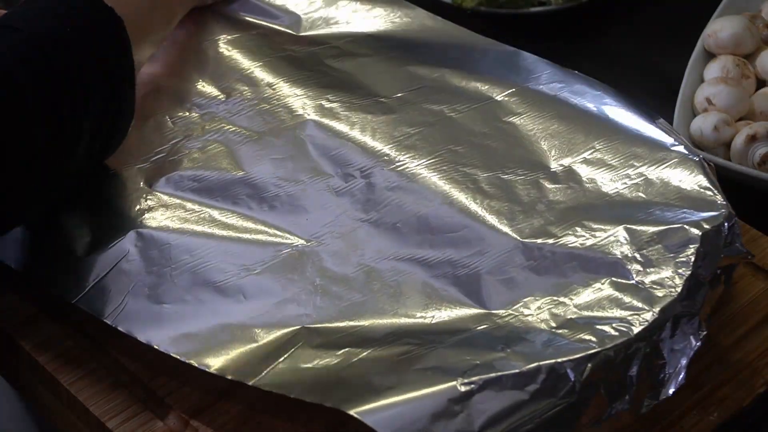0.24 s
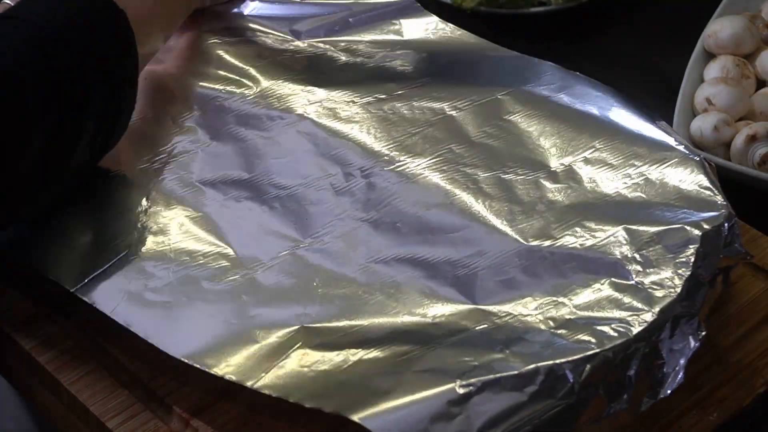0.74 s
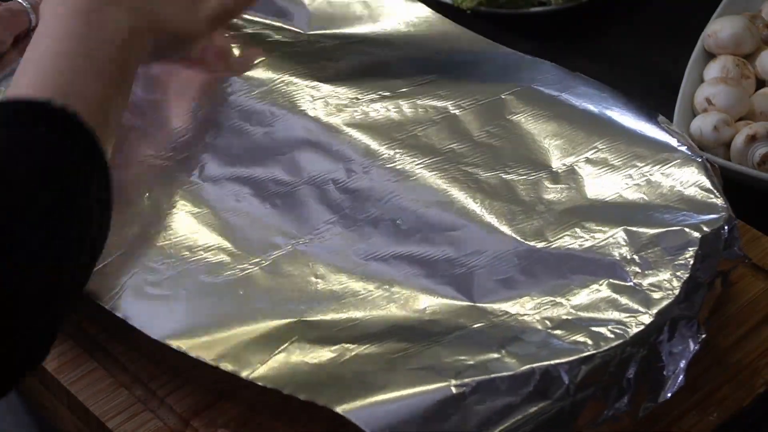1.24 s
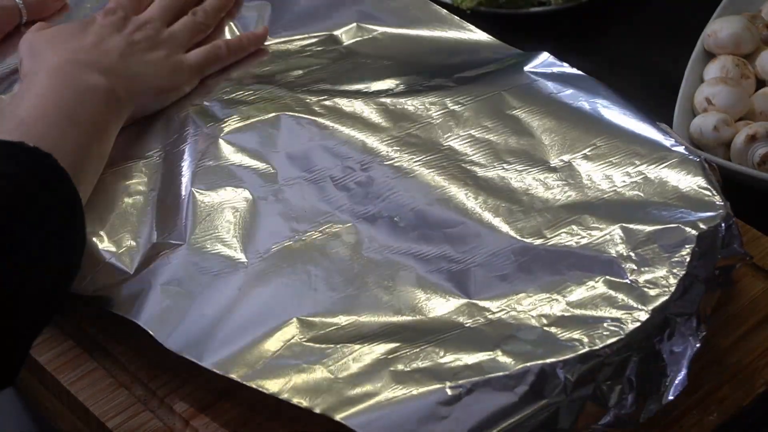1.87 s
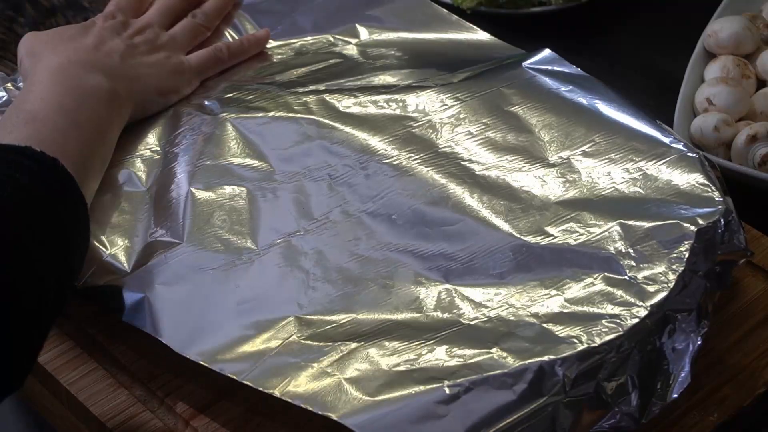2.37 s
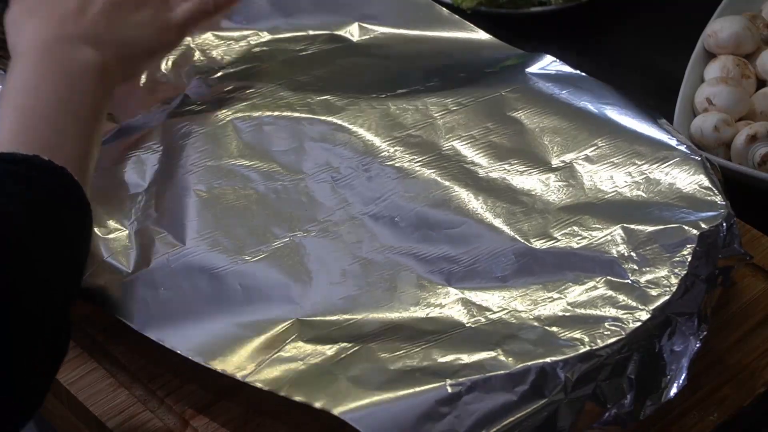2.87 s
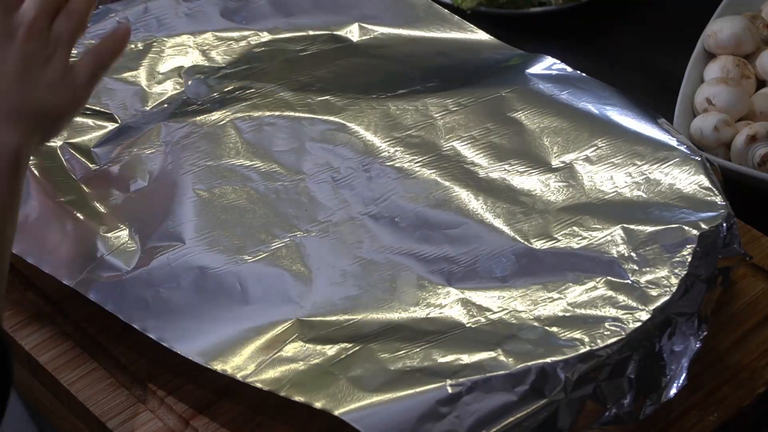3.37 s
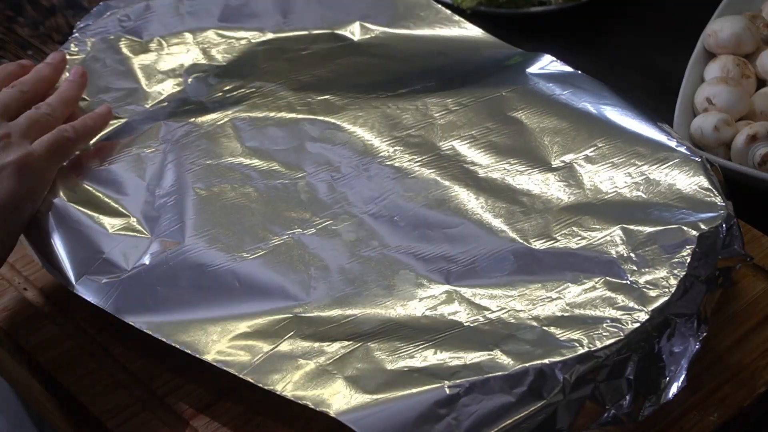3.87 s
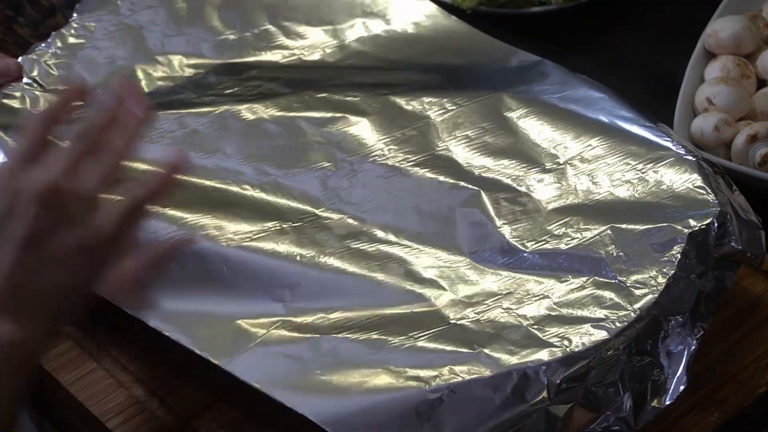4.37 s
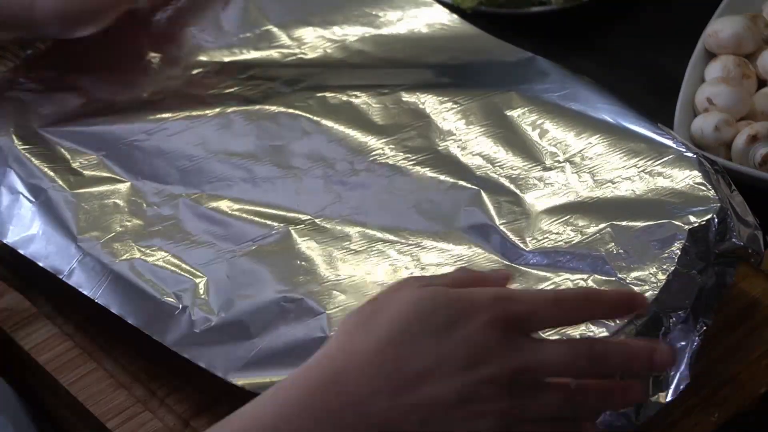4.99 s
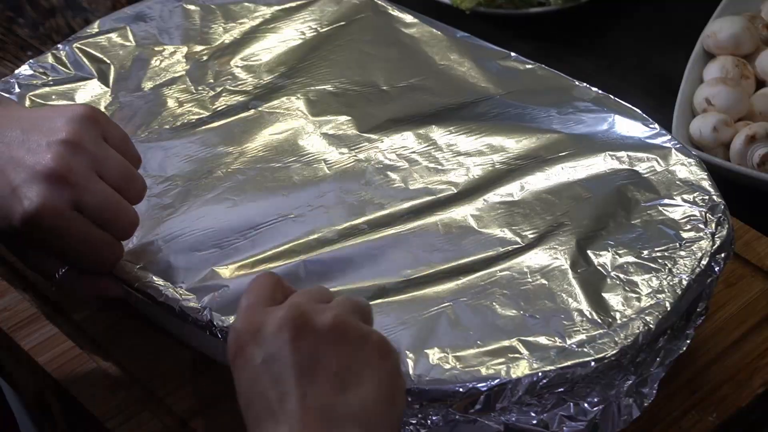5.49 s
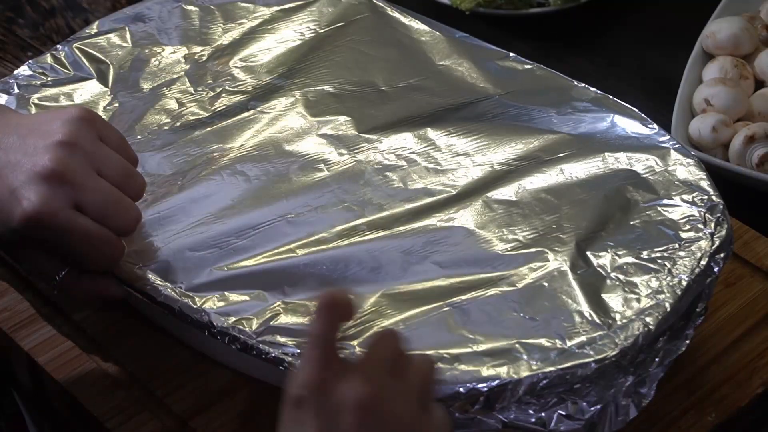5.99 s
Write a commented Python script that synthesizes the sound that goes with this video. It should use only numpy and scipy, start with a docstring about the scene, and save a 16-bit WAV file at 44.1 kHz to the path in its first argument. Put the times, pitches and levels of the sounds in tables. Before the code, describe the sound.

A thin metal sheet rustles, then crumples loudly under moving hands, with brief near-pauses between pushes. Palm pats make the foil flutter and buckle with short sinking pops; later small fingertip crackles give way to long, dense crinkling and short presses round the rim. The close stereo pickup is bright and wide, with a little kitchen reflection and a faint motor hum beneath.

```python
"""A foil rustle over a low appliance hum is heard first; sudden crumples and sharp snaps soon follow.
Two hands spread aluminium foil over a baking dish and crimp it round the rim, close to a stereo microphone.
Crease snaps are random impulses, up to thousands a second, driven by steady pushes and sudden avalanches.
Palm pats are decaying resonant noise, and panels popping through are brief tones of sinking pitch.
Decaying noise stands for the reflections and the small kitchen that smear the foil sounds."""
import sys
import numpy as np
from scipy import signal
from scipy.fft import rfft, irfft, next_fast_len
from scipy.io import wavfile
from scipy.ndimage import uniform_filter1d

SR = 44100
rng = np.random.default_rng(int(sys.argv[2]) if len(sys.argv) > 2 else 0)


def wrap_up_sound(samples):
    """Save the sound to the file named by the first command line argument, as 16-bit audio."""
    columns = np.atleast_2d(samples).T
    # keep every value between -1 and 1, then stretch to whole-number steps
    tamed = np.clip(columns, -1, 1)
    steps = np.round(tamed * 32767).astype(np.int16)
    wavfile.write(sys.argv[1], SR, steps)


N = 275625
T = np.arange(N) / SR
FFT_SIZE = next_fast_len(N + SR // 4)
FREQS = np.maximum(np.fft.rfftfreq(FFT_SIZE, 1 / SR), 1)


def amp(db):
    """Decibel law: level to amplitude gain."""
    return 10 ** (np.asarray(db) / 20)


def unit(x):
    """Normalisation to an rms of 1."""
    return x / np.sqrt(np.mean(x ** 2))


def shape(points):
    """Spectral envelope: dB points interpolated over log frequency, as gains."""
    hz, db = np.transpose(points)
    return amp(np.interp(np.log(FREQS), np.log(hz), db))


def colour(x, gain):
    """Linear filtering: the spectrum is multiplied by a gain at every frequency."""
    return irfft(rfft(x, FFT_SIZE) * gain, FFT_SIZE)[..., :N]


def below(hz, order=6):
    """Soft band edge: a share that falls from 1 to 0 and is one half at hz."""
    return 1 / (1 + (FREQS / hz) ** order)


def walk(rate):
    """Band-limited random modulation: interpolated normal values, rate per second."""
    return np.interp(T * rate, np.arange(4096), rng.standard_normal(4096))


def add(track, s, sound):
    """Superposition: a sound is mixed into a track from time s on."""
    start = int(np.clip(s * SR, 0, N - 1))
    track[start:start + len(sound)] += sound[:N - start]


def burst(rise_s, decay_s):
    """Transient envelope: an exponential rise times an exponential decay."""
    t = T[:SR // 2]
    return (1 - np.exp(-t / max(rise_s, 1e-4))) * np.exp(-t / max(decay_s, 1e-3))


PUSH_ATTACK_S, PUSH_RELEASE_DB_PER_S = 0.02, 192


def push(start_s, length_s, swell_db):
    """Quasi-static loading: the hand takes hold, presses harder or eases off, and lets the sheet settle."""
    t = T - start_s
    attack = np.clip(t / max(PUSH_ATTACK_S, .001), 0, 1)
    hold_db = swell_db * (np.clip(t / max(length_s, .001), 0, 1) - .5)
    release_db = PUSH_RELEASE_DB_PER_S * np.maximum(t - length_s, 0)
    return attack * amp(hold_db - release_db)


# FINE_SHORTENING is dB off the decay time per dB of fineness
CRUMPLE_RISE_S, CRUMPLE_DECAY_S, FINE_SHORTENING = 0.0033, .015, .5


def avalanche(fineness):
    """Avalanche relaxation: a fold collapses at once and its snaps die away, sooner for fine folds."""
    swell = burst(CRUMPLE_RISE_S, CRUMPLE_DECAY_S * amp(-FINE_SHORTENING * fineness))
    return swell / swell.max()


# level under a firm hand/dB, dB gained per dB of force, dB gained per dB of fineness
FACETS, CREASES, WRINKLES = (-11.5, 0.82, -1.18), (-0.15, .97, -0.081), (1.95, 1.44, 0.35)
FIRM_DB = -23  # force of a firm hand; the levels above are relative to it


def yielding(force, fineness):
    """Power-law response: wrinkles grow fastest with force, so a harder hand buckles finer foil."""
    relative_force = force / amp(FIRM_DB)
    return np.array([amp(FIRM_DB + rel_db + per_fineness * fineness) * relative_force ** per_force
                     for rel_db, per_force, per_fineness in (FACETS, CREASES, WRINKLES)])


# only the fingertips pick at the rim for a while, so mostly mid-sized creases snap
FINGERTIPS_S = (3.2, 3.58)  # start and end
FINGERTIP_DB = (-4.5, 0, -3)  # change of facets, creases, wrinkles


def fingertips(fade_s=.05):
    """Selective excitation: large facets and fine wrinkles weaken while the palm is off the sheet."""
    start_s, end_s = FINGERTIPS_S
    share = np.clip(np.minimum(T - start_s, end_s - T) / max(fade_s, .005) + .5, 0, 1)
    return amp(np.outer(FINGERTIP_DB, share))


# a hand pushes the foil along or presses it round the rim:
# start t/s, length/s, force level/dB, swell from start to end/dB, fineness of the creases/dB
PUSHES = [ (-.04, 0.047, -32, -2.5, -1), (.085, 0.095, -25.5, 5.5, -1), (.34, 0.16, -40.5, 5.5, -2.5),
          (0.615, 0.068, -22.5, 1.5, -0.5), (0.677, 0.13, -27, -5, 1), (0.817, 0.055, -24.5, 1, 1),
          (0.92, 0.22, -34.5, -3, 0.5), (1.217, 0.14, -26.5, -5.5, 0.5), (1.352, 0.37, -24.5, 1, -1),
          (1.717, 0.27, -29, -6, -2.5), (2.028, .115, -21.5, 1, -2), (2.17, 0.12, -27, 6, -2),
          (2.37, .15, -39, 12.5, -3.5), (2.502, 0.19, -30.5, 2, -2.5), (2.823, 0.11, -32, -4, 1.5),
          (2.955, .2, -42.5, 1, -3), (3.214, .195, -33.5, -1, -0.5), (3.533, 0.065, -30.5, -1, 6),
          (3.597, 0.266, -27.5, 5, -0.5), (3.901, 0.46, -25, -0.5, 0), (4.372, .18, -23, 4, 1),
          (4.563, 0.22, -26.5, 4, 1.5), (4.971, .05, -38, 15, 0), (5.014, 0.3, -23, -3, 0),
          (5.32, .2, -30.5, -0.5, 0.5), (5.524, 0.13, -24, -3.5, 0.5), (5.706, 0.2, -28, 2, 1.5),
          (5.939, 0.12, -27, -11.5, 1.5)]
# a fold gives way in an avalanche of snaps: t/s, peak force level/dB, fineness of the creases/dB
CRUMPLES = [ (0.0523, -27.5, 0), (0.0713, -30, 4), (.0976, -26.5, -3), (.1744, -21, 2), (.439, -29.5, -3.5),
            (.555, -29, 5), (0.569, -34.5, -5), (.61, -18, -5), (0.655, -19, -2.5), (.7244, -23, 4),
            (0.983, -26.5, 5), (1.1168, -31, 6), (1.2335, -26, 4), (1.386, -21.5, 0), (1.486, -19, -0.5),
            (1.619, -19, 0.5), (1.6782, -25, -6), (1.82, -23.5, -3), (1.91, -25, -2.5), (2.01, -26.5, -5),
            (2.055, -21, -3.5), (2.289, -22, 10), (2.4148, -35, 6), (2.45, -32.5, 1), (2.4797, -32.5, 3.5),
            (2.5355, -26, 0), (2.583, -24.5, -3), (2.653, -26, 8.5), (2.6956, -21, 0),
            (2.8408, -27.5, -0.5), (2.9227, -29.5, 12.5), (3.063, -32.5, -2.5), (3.178, -30.5, 10),
            (3.2285, -30.5, -4), (3.2958, -25.5, 1), (3.356, -27.5, 0), (3.4415, -27, 5), (3.48, -22.5, 6),
            (3.5542, -28.5, 7), (3.6053, -22, 3.5), (3.8145, -21, -1.5), (3.946, -20, 0), (3.999, -19.5, 5),
            (4.104, -20, 2), (4.3968, -20.5, 2), (5.3015, -19, -3), (5.343, -23.5, -0.5), (5.4105, -25, 2),
            (5.5427, -21.5, 6), (5.73, -24.5, 6), (5.7727, -27, 10), (5.959, -20, 2), (6.221, -28, 3),
            (6.2366, -27, 4)]
# smaller folds give way at random under a moving hand, at about its level
FOLDS_PER_S, FOLD_DB = 9, -0.5


def buckling(rest_db=-65):
    """Buckling instability: strengths of facets, creases, wrinkles, the greater of pushes and avalanches."""
    steady, sudden, folds = np.zeros((3, N)), np.zeros((3, N)), np.zeros(N)
    for s, length_s, db, swell_db, fineness in PUSHES:
        force = amp(db) * push(s, length_s, swell_db)
        moving = force > amp(rest_db)
        steady[:, moving] = np.maximum(steady[:, moving], yielding(force[moving], fineness))
    for s, db, fineness in CRUMPLES:
        strengths = yielding(amp(db) * avalanche(fineness), fineness)
        for track, strength in zip(sudden, strengths):
            add(track, s, strength)
    for when, size in rng.random((int(FOLDS_PER_S * T[-1]), 2)):
        add(folds, when * T[-1], amp(FOLD_DB) * (.5 + size) * avalanche(0))
    return np.maximum(steady * np.maximum(folds, 1), sudden) * fingertips()


def linger(power, t60):
    """Exponential energy decay: power is smoothed by a reverberation time of t60 seconds."""
    keep = np.exp(-2 * np.log(1000) / (max(t60, .001) * SR))
    return signal.lfilter([1 - keep], [1, -keep], power)


def rings(count=4000, ring_t60=0.12, size_db=3.0):
    """Modal ringing: facets ring at random instants, each at its own pitch; higher ones die sooner."""
    out, t = np.zeros(N), T[:2400]
    for when, pitch, size in rng.random((count, 3)):
        hz = 450 + 15000 * pitch ** 2
        t60 = ring_t60 * (hz / 2000) ** -.3
        ring = np.sin(2 * np.pi * hz * t) * np.exp(-np.log(1000) * t / t60)
        level = amp(size_db * min(-np.log(1 - size), 3)) * np.sqrt((pitch + .05) / t60)
        add(out, when * T[-1], level * ring)
    return unit(out)


# spectral envelope of the foil, rescaled in each size zone: f/Hz, relative level per Hz/dB
FOIL = [(120, -41), (200, -17.5), (236, -13), (310, -19.5), (430, -16), (506, -4.5), (653, -9), (769, -5.5),
        (1030, -3), (1840, -4), (4410, 0), (13200, -1.5), (15500, -6.5)]
# stereo width, before each user's own offset: f/Hz, side minus mid level/dB
WIDTH = [(100, -25), (380, -16.5), (1290, -13), (2400, -9), (4400, -8), (8100, -5.5), (15000, -4.5)]


def crinkle(snap_rate=7000, crowding=.6, scatter_db=1.5, colour_db=1.5, jerk_db=1.1, jerk_rate=130, sheet_t60=0.13,
            room_t60=(.4, .36, .27), room_db=0, wet_db=(-3, -1, 0), side_db=2, ring_db=(-8, -10, -12)):
    """Random impulse process: creases snap more densely under a harder hand, each of its own size and colour."""
    strength = buckling()
    rate = snap_rate * (strength[1] / strength[1].max()) ** crowding + 400  # snaps per second
    snapping = rng.random(N) < rate / SR
    size = amp(scatter_db * np.minimum(rng.exponential(size=N), 4))
    # the foil yields in small jerks, which make neighbouring snaps loud or soft together
    snaps = snapping * size / np.sqrt(rate) * amp(jerk_db * walk(jerk_rate))
    # facets sound low, creases in the middle, wrinkles high
    facet_edge, wrinkle_edge = below(1900, order=10), below(8000)
    zones = facet_edge, np.abs(wrinkle_edge - facet_edge), 1 - wrinkle_edge
    foil, width, ringing = shape(FOIL), amp(side_db) * shape(WIDTH), rings()
    room_power = amp(room_db) ** 2
    mid, side = 0, 0
    for zone, gain, t60, wet, ring in zip(zones, strength, room_t60, amp(wet_db), amp(ring_db)):
        snap_colour = amp(colour_db * np.clip(rng.standard_normal(N), -2, 2))
        clicks = unit(snaps * snap_colour * rng.choice([-1, 1], N))
        direct = gain * (clicks + ring * ringing) / np.hypot(1, ring)
        # every snap starts from another spot on the sheet, so their echoes merge into a colourless wash
        sheet_echo, room_echo = linger(direct ** 2, sheet_t60), linger(direct ** 2, t60)
        wash = np.sqrt((sheet_echo + room_power * room_echo) / (1 + room_power))
        tone = unit(foil * np.sqrt(zone))
        blend = (direct + wet * wash * rng.standard_normal(N)) / np.hypot(1, wet)
        mid = mid + colour(blend, tone)
        side = side + colour(wash * rng.standard_normal(N), tone * width)
    return np.array([mid + side, mid - side])


# spectral envelope of the room noise: f/Hz, relative level per Hz/dB
KITCHEN = [(20, -8), (30, -3), (42, -27), (75, -1), (105, 2), (165, -5.5), (195, 1.5), (300, -6.5),
           (600, -5.5), (1500, -14), (5000, -14), (16000, -28)]
KITCHEN_DB = -47.5  # rms of the middle noise
# tones of the appliance motor: f/Hz, mean rms level/dB
HUM = [(56.8, -49.5), (110, -58.5)]


def kitchen(side_db=1):
    """Tones in noise: motor partials of slightly wandering level hum under soft, shaped room noise."""
    hum = 0
    for hz, db in HUM:
        hum = hum + np.sqrt(2) * amp(db + .5 * walk(2.85)) * np.sin(2 * np.pi * hz * T)
    mid, side = (amp(KITCHEN_DB) * unit(colour(rng.standard_normal(N), shape(KITCHEN))) for _ in range(2))
    side = amp(side_db) * colour(side, shape(WIDTH))
    return hum + np.array([mid + side, mid - side])


# lone sharp snaps: t/s, peak level before the high-pass/dB, high-pass corner f/Hz
TICKS = [(.0525, -27, 3000), (.3046, -8.5, 10000), (.6112, -21, 2000), (0.6125, -11, 5000),
         (2.386, -19, 5000), (3.359, -21, 3030), (3.445, -20, 5000), (3.822, -27, 5000), (3.862, -11, 5000),
         (4.991, -31, 4840), (6.2319, -17, 4900), (6.2412, -17, 4000)]


def ticks(decay_s=0.00035):
    """Impulsive radiation: single creases crack as very short, high-passed noise."""
    out = np.zeros(N)
    for s, db, edge_hz in TICKS:
        crack = rng.standard_normal(256) * np.exp(-T[:256] / decay_s)
        b, a = signal.butter(2, edge_hz, "high", fs=SR)
        add(out, s, amp(db) * signal.lfilter(b, a, crack / np.abs(crack).max()))
    return out


# a palm pats the foil on the dish: t/s, centre f/Hz, flutter level before the envelope/dB, decay constant/s
PATS = [(0.611, 506, -31, 0.052), (.615, 169, -39, 0.043), (2.125, 500, -43, 0.1), (2.168, 150, -42, 0.063),
        (3.118, 240, -39.5, .05), (3.231, 262, -45, 0.27), (6.078, 396, -36, 0.028),
        (6.104, 617, -49, 0.043)]


def pats(q=1.0, rise_s=0.0032):
    """Damped resonance: under a palm the whole sheet flutters dully over the hollow dish."""
    out = np.zeros(N)
    for s, hz, db, decay_s in PATS:
        b, a = signal.iirpeak(hz, max(q, .5), fs=SR)
        flutter = signal.lfilter(b, a, signal.lfilter(b, a, rng.standard_normal(SR // 2)))
        add(out, s, amp(db) * unit(flutter) * burst(rise_s, decay_s))
    return out


# a panel of the sheet flips through: t/s, middle pitch f/Hz, level before the envelope/dB
POPS = [(0.622, 314, -19.5), (.626, 570, -25.5), (0.645, 280, -20.5), (.666, 970, -30), (2.083, 960, -29),
        (2.149, 325, -18), (2.152, 560, -21), (3.064, 2550, -30), (3.077, 1320, -31.5), (3.126, 200, -35),
        (3.13, 91, -30), (3.2286, 2680, -24.5), (3.252, 1840, -28.5), (3.299, 3400, -22),
        (3.601, 2080, -27.5), (5.962, 1940, -32), (6.099, 285, -35), (6.219, 2410, -29), (6.241, 2430, -36)]
POP_T60_S, POP_SHORTENING = 0.055, 0.41  # ring time at 1 kHz; exponent by which higher panels die sooner


def pops(sag=0.16, rise_cycles=0.61, rough=0.52):
    """Snap-through: flipping panels ring, chatter on their neighbours and sink in pitch as tension eases."""
    out, t = np.zeros(N), T[:SR // 2]
    for s, hz, db in POPS:
        t60 = POP_T60_S * (hz / 10 ** 3) ** -POP_SHORTENING
        pitch = hz * (1 + sag * (np.exp(-3 * t / t60) - .5))
        phase = 2 * np.pi * np.cumsum(pitch) / SR
        chatter = rough * walk(min(hz / 2, 600))[:len(t)]  # random phase roughens the tone
        envelope = burst(rise_cycles / hz, t60 / np.log(1000))
        add(out, s, amp(db) * envelope * np.sin(phase + 2 * chatter))
    return out


def reflections(near_s=0.012, room_db=-13, t60=0.62):
    """Diffuse impulse response of unit energy: quick echoes off sheet and worktop, then the kitchen."""
    t = T[:SR // 2]
    decay = np.exp(-t / near_s) + amp(room_db) * np.exp(-np.log(1000) * t / t60)
    response = rng.standard_normal(len(t)) * decay
    return response / np.linalg.norm(response)


def place(x, wet_db, side_db):
    """Decorrelation: direct sound stays in the middle while independent reflections spread it."""
    mid = x + amp(wet_db) * signal.oaconvolve(x, reflections())[:N]
    side = amp(side_db) * signal.oaconvolve(x, reflections())[:N]
    return np.array([mid + side, mid - side])


PAN_DB = -0.85  # left minus right, scaled by lean in the body and by beam in the treble


def scene(beam_hz=9000, beam=2.7, lean=0.86):
    """Interaural level difference: the foil lies slightly to the right, which shows most in the treble."""
    foil = crinkle() + place(ticks(), wet_db=1, side_db=-2)
    foil = foil + place(pats() + pops(), wet_db=-1.5, side_db=-29)
    pan_db = PAN_DB * np.array([[.5], [-.5]])
    body = colour(foil, below(beam_hz, order=4))
    treble = foil - body
    return body * amp(lean * pan_db) + treble * amp(beam * pan_db) + kitchen()


TOP_HZ = 15950


def record(dry, knee_db=-10.5, window_s=0.0059, release_db_per_s=30):
    """Soft-knee compression: gain control ducks everything under loud crumples; the top is cut steeply."""
    power = uniform_filter1d(np.mean(dry ** 2, axis=0), size=max(int(window_s * SR), 8))
    level_db = 10 * np.log10(power + 1e-9)
    # peaks are held and released at a constant slope
    fall = release_db_per_s * T
    held_db = np.maximum.accumulate(level_db + fall) - fall
    gain = (1 + amp(held_db - knee_db) ** 2) ** -.25  # approaches two to one above the knee
    top_cut = signal.ellip(12, .1, 80, TOP_HZ, fs=SR, output="sos")
    return signal.sosfilt(top_cut, dry * gain)


dry = scene()
out = record(dry)
wrap_up_sound(out)
```